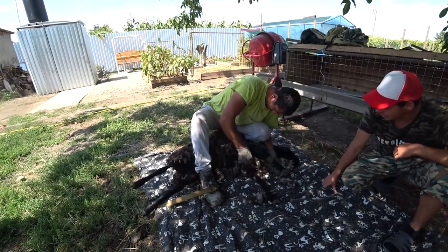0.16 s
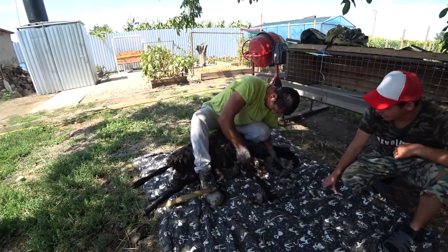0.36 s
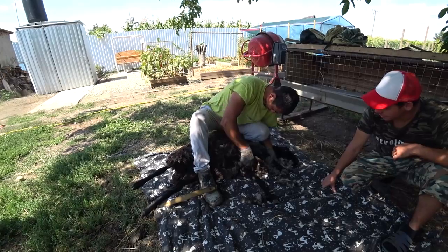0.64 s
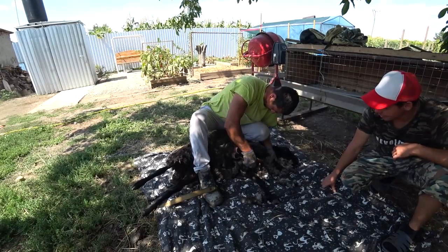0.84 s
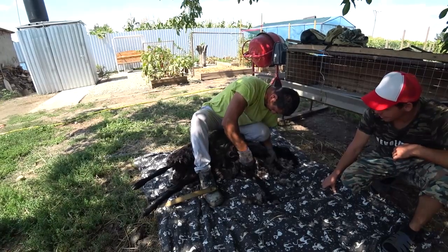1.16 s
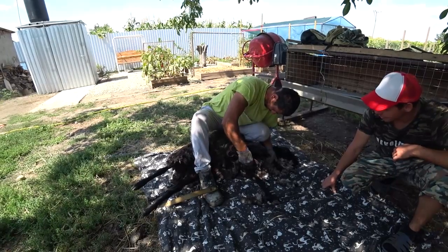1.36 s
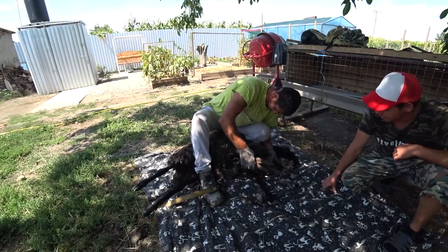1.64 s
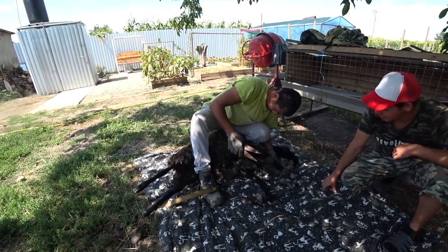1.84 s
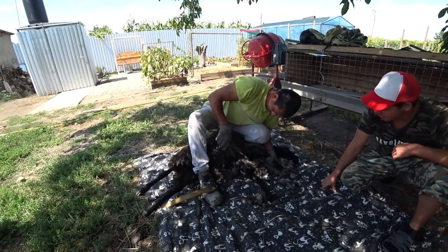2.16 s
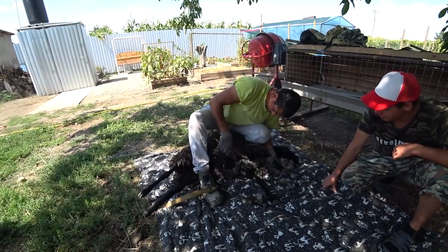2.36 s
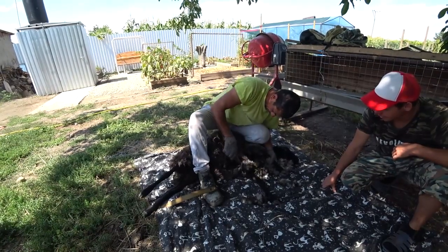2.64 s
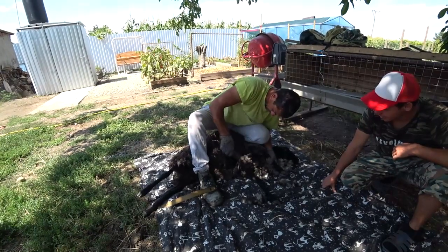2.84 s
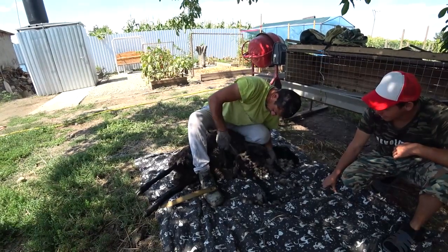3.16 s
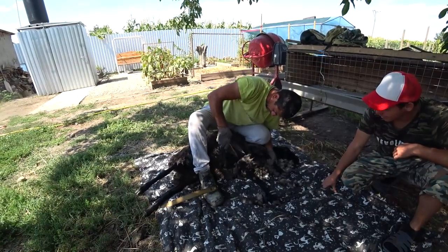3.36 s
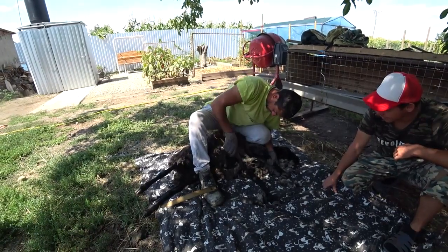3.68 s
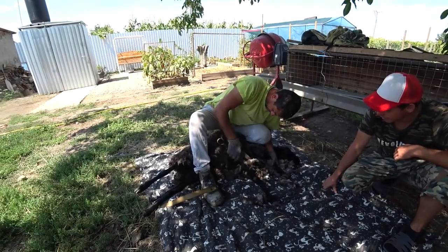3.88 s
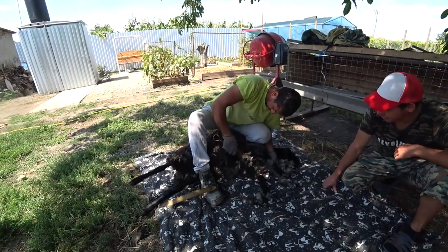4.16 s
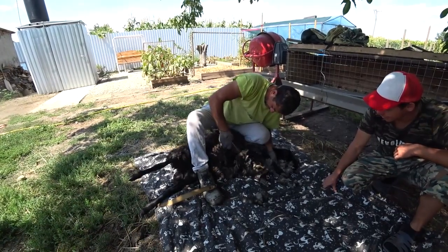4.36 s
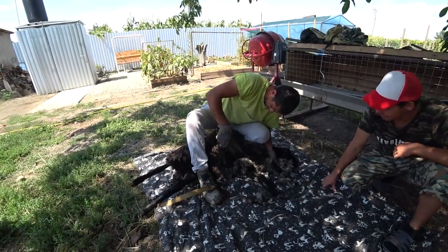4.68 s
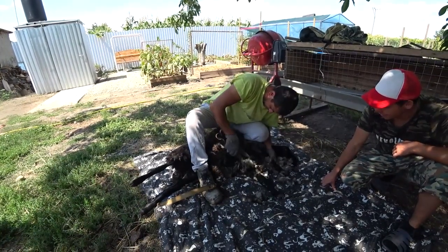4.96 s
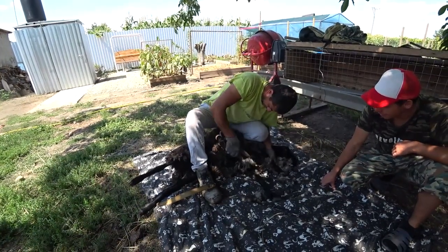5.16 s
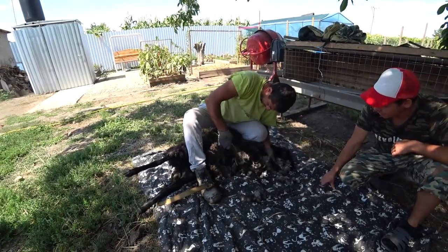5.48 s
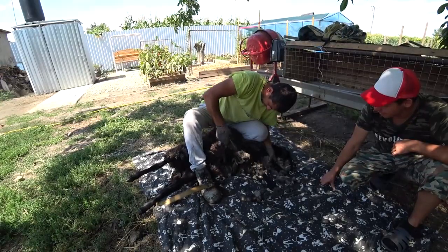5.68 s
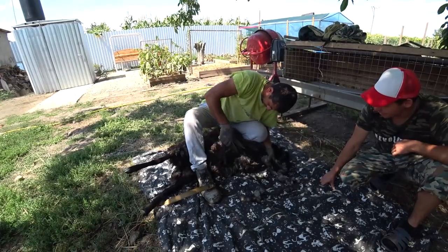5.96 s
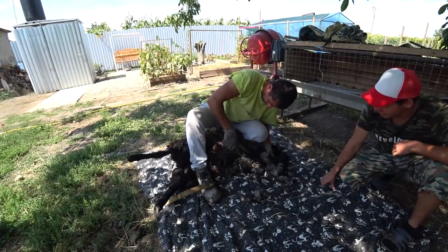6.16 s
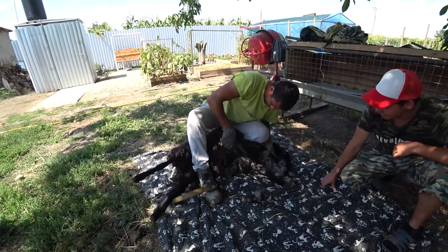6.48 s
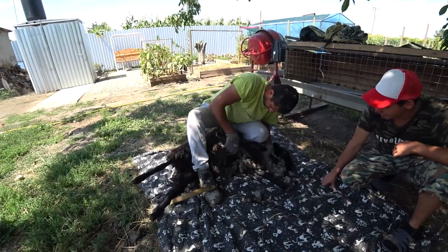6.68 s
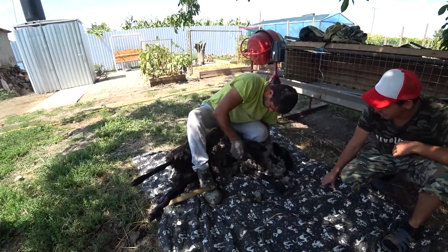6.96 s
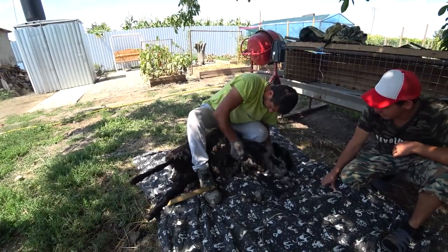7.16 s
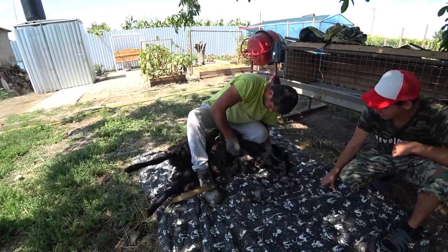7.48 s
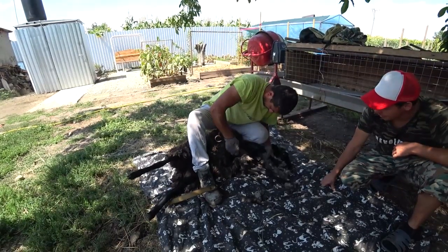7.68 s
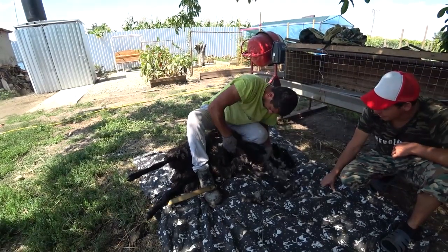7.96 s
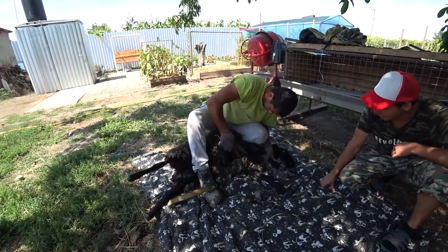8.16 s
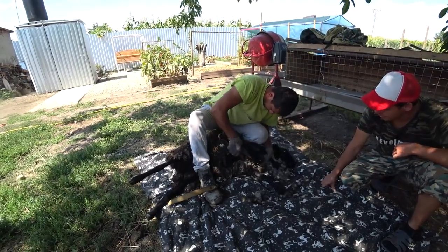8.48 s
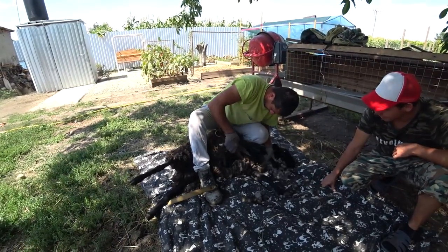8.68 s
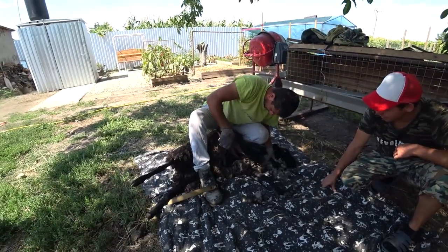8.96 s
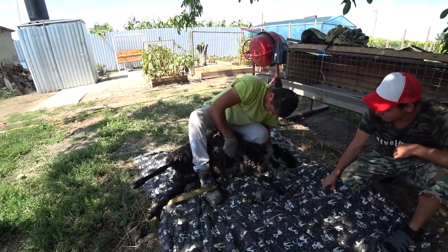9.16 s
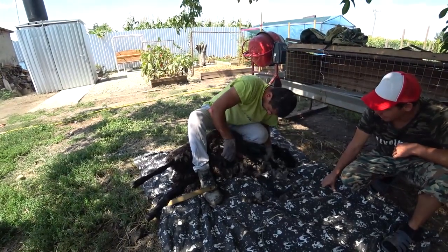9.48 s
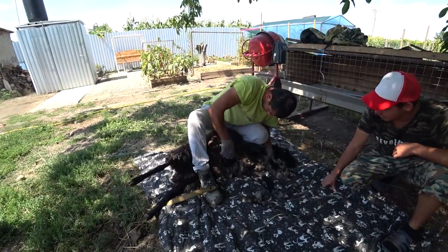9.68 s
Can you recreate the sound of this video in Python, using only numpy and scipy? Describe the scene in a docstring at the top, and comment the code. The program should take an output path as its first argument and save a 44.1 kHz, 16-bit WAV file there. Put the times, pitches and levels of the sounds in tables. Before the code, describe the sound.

In a quiet grassy yard, hand shears work close to a stereo microphone. Small crackling jerks lead to bright metallic snips, two in quick succession near one and a half seconds, then scattered singles. Wool grinds and tears between them, hands rub the fleece, and dull bumps follow. A dog gives two short barks early; distant yelps and birds are barely heard.

```python
"""Hand shears clip a sheep close by in a farmyard: the blades slide shut, stop and ring, and grind through wool.
Slides and cuts are bursts of tiny noise slips coloured by blade resonances; the ring is a sum of decaying sines.
Sharp noise clicks, crackling fleece, dull scuffs and bumps and one rough muffled burst accompany the work.
A dog barks twice nearby, from wavering overtones and throat noise; thin yelps and bird calls are gliding sines
further off, over a quiet outdoor background of coloured noise."""
import sys
import numpy as np
from scipy import signal
from scipy.fft import rfft, irfft, next_fast_len
from scipy.io import wavfile
from scipy.ndimage import uniform_filter1d

SR = 44100
rng = np.random.default_rng(int(sys.argv[2]) if len(sys.argv) > 2 else 0)


def put_to_file(sound):
    """Save the sound as 16-bit audio at rate SR, in the file named by the first command-line argument."""
    columns = np.atleast_2d(sound).T  # one column per channel
    safe = np.clip(columns, -1, 1)
    whole_steps = np.round(safe * 32767)
    wavfile.write(sys.argv[1], SR, whole_steps.astype(np.int16))


N = 433503
TIME = np.arange(N) / SR

# Blades closing, a slide and then a stop. Each row: slide peak in seconds, slide level in dB, slide tilt in
# dB per octave, delay to the stop in seconds, stop level in dB, stop tilt in dB per octave, stop fall in
# seconds, hollow body boost near 1.9 kHz in dB, ring peak in dB, hardest driven resonance in Hz,
# left minus right in dB.
SNIPS = [(.596, -26, 4, .006, -25.5, -4.5, 0.0052, 27, -27, 2010, -5),
         (1.381, -18.5, 4.5, 0.017, -24.5, 1.5, 0.057, 17, -42, 5830, -1),
         (1.507, -14, -1, .013, -15, 4.5, 0.0062, 13.5, -21, 4250, -1.5),
         (3.381, -21.5, 5.5, 0.0067, -21.5, -1.5, .011, 16.5, -27, 2910, -2),
         (4.452, -25.5, 5.5, .011, -15.5, 1, 0.0071, 2, -17.5, 5700, -1.5),
         (5.791, -16, 4, 0.013, -16, 0, 0.0052, 14, -17, 3100, -1.5),
         (8.203, -13, 2.5, .013, -14.5, 2.5, 0.0061, 7, -14.5, 3070, -2)]
# Ringing modes of the free blades. Each row: frequency in Hz, relative level in dB, 60 dB decay in seconds.
BLADE_MODES = [(1210, -7.5, 0.18), (1504, -8, 0.14), (2694, 1.5, 0.059), (3170, 0, 0.028), (3340, 5, 0.013),
               (3730, -11, .04), (4114, 8, 0.14), (4120, -14.5, 0.72), (5560, -13, .05), (5640, 2, 0.083),
               (7280, 6, 0.097), (8950, -6.5, .07), (10100, -8.5, .07), (11990, -1, 0.067)]
# Broad colour of steel sliding on steel. Each row: frequency in Hz, relative level in dB.
SLIDE_COLOUR = [(40, -62.5), (120, -47), (350, -45), (700, -6), (1100, 1), (1900, -6.5), (2250, -14),
                (2800, -15.5), (3600, 12), (4700, 7.5), (5600, 10.5), (7800, 4.5), (10000, 3.5),
                (16000, -11)]
SLIDE_RISE_S, SLIDE_FALL_S, STOP_RISE_S = 0.0077, 0.0055, 0.0053
STOP_BODY_SHARE = 0.97  # share of the hollow boost in dB left once the blades overlap
SLIDE_BITE_DB, STOP_BITE_DB, BITE_WIDTH_HZ = -5.5, -21.5, 130  # the hardest driven resonance


def snips():
    """Edge slides on edge in a rush of tiny slips and stops; freed from the wool, the blades ring on."""
    out = np.zeros((2, N))
    ring = blade_ring()
    pressed = [(hz, 110, db) for hz, db, _ in BLADE_MODES]  # pressed together, the same modes are broad
    for (s, slide_db, slide_slope, gap, stop_db, stop_slope, stop_fall,
         hollow_db, ring_db, bite_hz, pan_db) in SNIPS:
        slide = stroke(s, SLIDE_RISE_S, SLIDE_FALL_S)
        stop = stroke(s + gap, STOP_RISE_S, stop_fall)
        contacts = [(slide, slide_db, slide_slope, hollow_db, SLIDE_BITE_DB),
                    (stop, stop_db, stop_slope, STOP_BODY_SHARE * hollow_db, STOP_BITE_DB)]
        for (start, force), db, slope, body_db, bite_db in contacts:
            rasp = steel_rasp(force, pressed, slope, body_db, bite_hz, bite_db)
            add(out, start, pan(undb(db) * scatter(rasp, db=-10.5), pan_db))
        add(out, s + gap, pan(undb(ring_db) * ring, pan_db))
    return out


def blade_ring():
    """The modes of the free blades die away, each at its own rate; peak level 1."""
    t = np.arange(SR // 2) / SR
    ring = sum(undb(db - 60 * t / t60) * np.sin(2 * np.pi * hz * t) for hz, db, t60 in BLADE_MODES)
    onset = 1 - np.exp(-t / .001)
    return ring * onset / np.abs(ring).max()


def steel_rasp(force, modes, slope, body_db, bite_hz, bite_db):
    """Dense slips drive the steel, its hollow body and the one resonance that is driven hardest."""
    slips = force * grains(len(force), share=.7, spread_db=1.0)

    def gain(f):
        broad = unit(colour(SLIDE_COLOUR, f))
        steel = np.hypot(broad, np.abs(blade(f, modes, drift=.006, spread_db=2.5)))
        hollow = undb(body_db * np.abs(resonance(f, 1910, 400)) ** 2)
        body = unit(steel * tilt(f, slope) * hollow)
        bite = undb(bite_db) * unit(resonance(f, bite_hz, BITE_WIDTH_HZ))
        return unit(body + bite)

    return shape(slips, gain)


# The hand squeezes the blades through a lock of wool. Each row: start in seconds, length in seconds, level at
# the start in dB, level at the end in dB, tilt in dB per octave, hardest driven resonance in Hz.
SQUEEZES = [(.01, 0.21, -56.5, -55, -0.5, 5900), (2.762, 0.25, -50.5, -49, -2, 2980),
            (3.133, 0.067, -47, -44.5, 0.5, 2980), (3.939, .045, -50, -42.5, 1, 3470),
            (4.049, 0.26, -52, -38, -1.5, 2550), (4.84, 0.152, -54, -62, -2.5, 2540),
            (5.24, 0.46, -58, -52, -3.5, 3100), (8.013, 0.041, -36, -31, 0, 5300),
            (9.697, .135, -49, -32.5, .5, 3050)]
# Hard jerks as a tuft gives way. Each row: peak in seconds, level in dB, fall in seconds, tilt in dB per
# octave, hardest driven resonance in Hz.
JERKS = [(.068, -38, .008, 0.5, 5820), (.119, -29, .004, -2, 5800), (0.151, -27.5, .005, 2, 6030),
         (0.175, -34.5, 0.011, 6, 5800), (.649, -37.5, .004, -1.5, 2006), (1.2, -32, 0.0061, 3.5, 5730),
         (1.369, -26, .006, 5, 5730), (2.797, -35.5, .003, 5, 2970), (2.856, -31, 0.0051, -1.5, 2970),
         (2.928, -37.5, 0.019, -0.5, 3100), (2.989, -27.5, 0.0052, -1, 3050),
         (3.018, -32, 0.0046, -2, 3050), (3.044, -30, 0.0052, -.5, 3110), (4.102, -34.5, 0.0094, 1, 2550),
         (4.291, -25.5, .009, 5, 5300), (5.301, -31.5, 0.014, -1, 3100), (5.376, -42.5, 0.021, -4, 3100),
         (7.3, -34.5, 0.0031, 3, 3180), (7.758, -39, 0.013, -2, 3160), (8.027, -26, 0.0093, 3, 5180),
         (8.052, -25, 0.0083, .5, 5280), (9.717, -35.5, 0.0046, -5, 5650), (9.735, -28, 0.0085, 0.5, 5670),
         (9.816, -33, .0065, 2, 3100)]
JERK_RISE_S, GRIP_S = 0.0034, 0.0046  # build-up of a jerk; time to grip and let go in a squeeze
JUDDER_HZ, JUDDER_SCATTER = 38.15, .3  # mean rate of stick and slip; its random variation as a share
JUDDER_DB, SLIP_SPREAD_DB = 11.5, 2.5  # fall in level over each slip; random level from slip to slip
BITE_DB, GRIND_BITE_DB = -6.5, -15.5  # hardest driven resonance in a jerk and in steady grinding


def cuts():
    """Each squeeze grinds on in a quick stick and slip; now and then a whole tuft gives way with a jerk."""
    out = np.zeros((2, N))
    for s, length, from_db, to_db, slope, bite_hz in SQUEEZES:
        t = np.arange(SR // 3) / SR
        rate = JUDDER_HZ * (1 + JUDDER_SCATTER * walk(JUDDER_HZ, size=len(t)))
        slip, cycle = np.divmod(np.cumsum(rate) / SR, 1)
        slip_db = SLIP_SPREAD_DB * rng.standard_normal(size=64)[slip.astype(int)]
        judder_db = JUDDER_DB * (.5 - cycle) + slip_db
        grip = np.clip(np.minimum(t, length - t) / GRIP_S, 0, 1)
        force = grip * undb(np.interp(t, [0, length], [from_db, to_db]) + judder_db)
        for turn in range(3):  # neighbouring slips catch at different places on the edge
            add(out, s, cut(force * (slip % 3 == turn), slope, bite_hz, GRIND_BITE_DB))
    for s, db, fall, slope, bite_hz in JERKS:
        start, force = stroke(s, JERK_RISE_S, fall)
        add(out, start, undb(db) * cut(force, slope, bite_hz, BITE_DB))
    return pan(out, -1.7)


# Blade resonances while wool damps them. Each row: frequency in Hz, width in Hz, relative level in dB.
DAMPED_MODES = [(490, 16, -4.5), (1376, 186, -6.5), (1810, 100, -5), (2530, 65, -0.5), (3072, 69, 5.5),
                (3550, 290, -3), (4180, 156, 1.5), (5265, 380, 3.5), (5707, 92, 5), (6620, 170, -2),
                (7460, 77, -1.5), (8650, 360, -7.5), (10020, 97, -8), (12500, 50, -4)]
# Colour of parting fibres. Each row: frequency in Hz, relative level in dB.
FIBRE_COLOUR = [(60, -49), (400, 15), (1000, -51), (2500, 55), (5500, -19.5), (9000, -22), (13000, 1),
                (16000, -32)]


def cut(force, slope, bite_hz, bite_db):
    """Fibres part between wool-damped blades; the crossing point of the edges drives one resonance hardest."""
    slips = force * grains(len(force), share=.15, spread_db=2.5)

    def gain(f):
        steel = blade(f, DAMPED_MODES, drift=0.016, spread_db=5.0)
        bite = undb(bite_db) * unit(resonance(f, bite_hz, bite_hz / 40))
        fibres = undb(-17.5) * unit(colour(FIBRE_COLOUR, f))
        return unit((steel + bite + fibres) * tilt(f, slope))

    return scatter(shape(slips, gain), db=-10.0)


def blade(f, modes, drift, spread_db):
    """Damped resonances; the crossing point of the edges shifts and reweights them at every stroke."""
    chance = rng.standard_normal((len(modes), 2))
    return unit(sum(undb(db + spread_db * a) * resonance(f, hz * (1 + drift * b), width)
                    for (hz, width, db), (a, b) in zip(modes, chance)))


# Sharp clicks of steel and snapping stalks. Each row: peak in seconds, level in dB before the common trim,
# fall in seconds, tilt in dB per octave.
CLICKS = [(.915, -34, 0.0068, -5), (0.946, -34.5, 0.0091, -5), (1.386, -.5, 0.0038, -3.5),
          (1.458, -15, 0.0015, -8), (1.605, -29.5, 0.0047, -7), (1.719, -34, 0.01, -7),
          (5.161, -28.5, 0.0029, -1), (5.23, -29, 0.0069, -4.5), (5.865, -22, 0.011, 0),
          (6.34, -33.5, 0.02, -3), (6.531, -33.5, 0.022, -8), (6.953, -25.5, .0012, -3),
          (7.033, -33.5, 0.009, 0), (7.709, -33, .005, -3), (8.073, -15, 0.003, -9),
          (9.005, -52, .0034, -9), (9.676, -32, 0.0087, -5)]
# Colour of the clicks. Each row: frequency in Hz, relative level in dB.
CLICK_COLOUR = [(50, -72), (300, -44), (800, -45.5), (1700, -8.5), (3300, -8.5), (4700, -1), (5700, 5),
                (6800, 2), (8000, 5.5), (10000, -1.5), (16000, -6)]


def clicks():
    """Abrupt contacts with almost no ring: noise bursts that rise almost at once."""
    out = np.zeros((2, N))
    for s, db, fall, slope in CLICKS:
        start, force = stroke(s, 0.00022, fall)
        noise = force * rng.standard_normal(len(force))
        crack = shape(noise, lambda f: unit(colour(CLICK_COLOUR, f) * tilt(f, slope)))
        add(out, start, undb(db - 5.5) * scatter(crack, db=-7.5))  # common trim of -5.5 dB
    return pan(out, -1.3)


# Hands push and pull the fleece. Each row: start in seconds, time until release in seconds, relative level in dB.
PUSHES = [(0.287, 0.15, -53), (1.557, .16, -53), (2.77, 0.29, -52), (3.406, 0.12, -52), (3.617, 0.2, -54.5),
          (3.938, 0.35, -49.5), (4.495, 0.26, -50), (4.818, 0.19, -54.5), (5.052, 0.35, -50.5),
          (5.57, 0.31, -48.5), (5.901, 0.29, -50.5), (6.371, 0.33, -52.5), (6.719, .13, -56.5),
          (6.841, 0.49, -52.5), (7.495, 0.32, -47.5), (7.859, 0.26, -52), (9.085, 0.69, -60.5)]
# Colour of the rustling fleece. Each row: frequency in Hz, relative level in dB.
FLEECE_COLOUR = [(50, -9), (140, -13.5), (400, -1), (1200, 3), (2200, 1.5), (3600, 3.5), (5600, 5.5),
                 (8000, 3.5), (12000, -0.5), (16000, -6)]
PUSH_ATTACK_S, PUSH_RELEASE_S = 0.035, 0.019
RESTING_DB = -59.5  # between pushes the fleece still stirs


def rustle():
    """Hands drag through the fleece: dense crackle in uneven pushes."""
    pushes = sum(undb(db) * swell(s, length, PUSH_ATTACK_S, PUSH_RELEASE_S) for s, length, db in PUSHES)
    effort = np.hypot(undb(RESTING_DB), pushes)
    slips = grains((2, N), share=.15, spread_db=-0.5)
    mid, side = unit(shape(slips, lambda f: colour(FLEECE_COLOUR, f)))
    crackle = mid + undb(-1.5) * side * np.array([[1], [-1]])
    flutter = undb(1.45 * walk(45) + 0.6 * walk(6.6))
    return pan(crackle * effort * flutter, -1.2)


# Dull scuffs and bumps, and a rough muffled burst near 7.15 s that may be a far bark. Each row: peak in
# seconds, level in dB before the common trim, fall in seconds, centre in Hz.
SCUFFS = [(5.837, -57, .025, 130), (5.89, -46.5, 0.063, 1210), (7.149, -40, 0.091, 860),
          (7.18, -46, 0.088, 4200), (7.268, -40.5, 0.017, 3000), (7.278, -45, 0.05, 200),
          (7.304, -65, .06, 60), (7.698, -51.5, 0.068, 292), (8.438, -42.5, .03, 1090),
          (9.42, -49, 0.036, 1160)]
SCUFF_RISE_SHARE = 0.21  # rise time as a share of the fall


def scuffs():
    """Dull scuffs and bumps and a rough muffled burst: sparse noise grains through one broad resonance."""
    out = np.zeros((2, N))
    for s, db, fall, hz in SCUFFS:
        start, force = stroke(s, SCUFF_RISE_SHARE * fall, fall)
        noise = force * grains(len(force), share=.05, spread_db=2.5)
        burst = shape(noise, lambda f: unit(resonance(f, hz, 1.4 * hz) ** 2))
        add(out, start, undb(db - 1.5) * scatter(burst, db=-11))  # common trim of -1.5 dB
    return out


# The near dog. Each row: start in seconds, length in seconds, pitch in the middle in Hz, level in dB,
# pitch arch as a share, pitch sag as a share, growl from 0 to 1, rasp from 0 to 1.
BARKS = [(.974, 0.18, 541.3, -17.5, .24, -0.0205, 0.45, 0.27),
         (1.201, 0.071, 522, -25.5, 0.028, .08, 0.3, 0.7)]
# Its throat and open mouth. Each row: frequency in Hz, relative level in dB.
THROAT = [(80, -39), (200, -32), (330, -21), (520, -14.5), (660, -18), (820, -5), (1080, -3), (1330, -1),
          (1600, -3), (1950, -15.5), (2500, -14.5), (3400, -8.5), (4600, -23), (7800, -17.5),
          (15000, -44.5)]
BARK_SWELL_DB, BARK_EDGE_S = 19.5, 0.0072  # gain from edges to middle; time the folds take to start and stop
BARK_HISS_DB, BARK_FULL_DB = 0.5, -17.5  # hiss against the voice at full level; that level
HISS_GROWTH = 1.25  # dB of hiss per dB of level
BARK_ECHO_S, BARK_ECHO_DB = 0.045, -16.5


def barks():
    """Effort arches pitch and level; uneven vocal folds and air rasping once a cycle share one throat."""
    out = np.zeros(N)
    for s, length, mid_hz, db, arch, sag, growl, rasp in BARKS:
        u = np.linspace(0, 1, int(length * SR))
        effort = 1 - (2 * u - 1) ** 2
        hz = mid_hz * (1 - arch * (1 - effort) - sag * (u - .5))
        phase = 2 * np.pi * np.cumsum(hz * (1 + .012 * walk(250, size=len(u)))) / SR
        folds = np.zeros(len(u))
        for k in range(1, 10):  # each overtone wavers on its own
            overtone = np.cos(k * phase + 2 * np.pi * rng.random()) / np.hypot(1, (k / 3.7) ** 3)
            folds += overtone * (1 + .28 * walk(200, size=len(u)))
        # growl: every second beat is weaker
        folds *= 1 + growl * effort * np.cos(phase / 2 + .5 * walk(77, size=len(u)))
        voice = unit(shape(folds, lambda f: colour(THROAT, f)))
        breath = rng.standard_normal(len(u)) * (1 + 0.2 * np.cos(phase))
        air = shape(breath, lambda f: unit(colour(THROAT, f)))
        hiss = shape(air, lambda f: 1 / (1 + (2200 / f) ** 6))  # the part above 2.2 kHz
        force = undb(BARK_SWELL_DB * (effort - 1))
        # only a hard bark is bright
        bright = undb(BARK_HISS_DB + HISS_GROWTH * (db - BARK_FULL_DB)) * force ** 0.42
        # the rasp clears as the folds take hold
        sound = voice + 2 * rasp * (1 - u) * (air - hiss) + bright * hiss
        edges = np.clip(np.minimum(u, 1 - u) * length / BARK_EDGE_S, 0, 1)
        add(out, s, undb(db) * force * edges * sound)
    echo = undb(BARK_ECHO_DB) * np.interp(TIME - BARK_ECHO_S, TIME, out)  # off the fence
    return pan(scatter(out + echo, db=-10), -.9)


# Far dogs yelping. Each row: start in seconds, level in dB before the yelp trim, pitch in Hz, length in seconds.
YELPS = [(0.364, -51, 1020, .05), (.512, -47.5, 1250, 0.047), (1.698, -44.5, 1092, 0.049),
         (2.125, -39.5, 1165, 0.03), (4.612, -56.5, 960, 0.062), (5.053, -47, 1103, 0.048),
         (6.125, -57, 1346, 0.12), (6.934, -46.5, 1093, 0.048), (7.094, -43.5, 1115, 0.12),
         (7.191, -49, 1395, 0.054), (9.34, -58, 902, 0.186), (9.47, -59, 1497, 0.09)]
# Birds. Each row: start in seconds, level in dB before the chirp trim, pitch in Hz, length in seconds,
# fall in pitch as a share.
CHIRPS = [(1.81, -55.5, 5450, .08, 0.046), (1.976, -58, 4140, 0.12, 0.4), (2.506, -54, 4320, 0.069, .08),
          (9.205, -57, 5500, .1, .4)]
YELP_SAG_PER_S = 0.77  # fall in pitch by the end, as a share per second of length


def far_calls():
    """Dogs yelp and birds chirp beyond the yard, each call a short sagging tone."""
    out = np.zeros(N)
    for s, db, hz, length in YELPS:
        add(out, s, undb(db + 3.5) * cry(hz, length, YELP_SAG_PER_S * length))  # yelp trim of +3.5 dB
    for s, db, hz, length, sag in CHIRPS:
        add(out, s, undb(db + 4) * cry(hz, length, sag))  # chirp trim of +4 dB
    return pan(out, 2.8)


def cry(hz, length, sag):
    """A nearly pure tone with a faint octave that swells, fades and sags in pitch."""
    u = np.linspace(0, 1, int(length * SR))
    waver = .02 * np.sqrt(hz / 1000) * walk(700, size=len(u))
    phase = 2 * np.pi * np.cumsum(hz * (1 - sag * u ** 1.5 + waver)) / SR
    return np.sin(np.pi * u) * (np.sin(phase) + undb(-24) * np.sin(2 * phase))


# Colour of the outdoor background. Each row: frequency in Hz, relative level in dB per Hz.
YARD_COLOUR = [(15, -75), (25, -79), (117, -16), (195, -5), (405, -5.5), (489, -3.5), (754, -5), (911, -3),
               (988, -2.5), (2000, -7), (2690, -8.5), (4250, -7), (5430, -11.5), (6380, -11.5),
               (16000, -41)]
YARD_DB = -58  # typical level of the middle signal


def yard():
    """Distant air and foliage: noise alike at both ears in the bass and wide in the treble."""
    mid, side = shape(rng.standard_normal((2, N)), lambda f: colour(YARD_COLOUR, f))
    side = shape(side, lambda f: .9 * (f + 100) / (f + 600))
    air = (mid + side * np.array([[1], [-1]])) / np.std(mid)
    return air * undb(YARD_DB + 0.65 * walk(2.53))


def space(x, far_db, t60):
    """Fence and sheds add a thin, duller tail, different at each ear."""
    t = np.arange(int(.7 * SR)) / SR
    far = rng.standard_normal((2, len(t))) * undb(-60 * t / t60) * (1 - np.exp(-t / .012))
    far = unit(shape(far, lambda f: 1 / np.hypot(1, f / 5000))) / np.sqrt(len(t))
    return x + undb(far_db) * signal.fftconvolve(x, far, axes=-1)[:, :N]


def scatter(x, db):
    """Ground and bodies scatter a sound within milliseconds; that part reaches the ears out of step."""
    t = np.arange(SR // 30) / SR
    response = rng.standard_normal(len(t)) * np.exp(-t / .005) * (t > .0004)
    side = signal.fftconvolve(x, response / np.linalg.norm(response))[:len(x)]
    return x + undb(db) * side * np.array([[1], [-1]])


def undb(db):
    """Decibels to gain."""
    return 10 ** (np.asarray(db) / 20)


def unit(x):
    """Scale to rms 1."""
    return x / np.sqrt(np.mean(np.abs(x) ** 2))


def shape(x, gain):
    """Filter by a gain given as a function of frequency."""
    size = next_fast_len(x.shape[-1] + 2048)
    f = np.maximum(np.arange(size // 2 + 1) * SR / size, 1)
    return irfft(rfft(x, size) * gain(f), size)[..., :x.shape[-1]]


def colour(points, f):
    """Gain at f of a spectrum of (Hz, dB) points."""
    hz, db = np.transpose(points)
    return undb(np.interp(np.log(f), np.log(hz), db))


def tilt(f, db_per_octave):
    """A slope that turns about 5 kHz and is flat below 1 kHz."""
    return undb(db_per_octave * np.log2(np.maximum(f, 1000) / 5000))


def resonance(f, hz, width):
    """Response of one resonance, gain 1 at its centre."""
    return 1 / (1 + 1j * (f * f - hz * hz) / (f * width))


def walk(rate, size=N):
    """Slow chance with spread near 1: random steps at the rate, smoothed."""
    k = int(SR / rate)
    steps = np.repeat(rng.standard_normal(size // k + 1), k)
    return 1.3 * uniform_filter1d(steps, k)[:size]


def grains(size, share, spread_db):
    """Tiny slips of uneven size on a share of the samples."""
    slips = rng.standard_normal(size) * (rng.random(size) < share)
    return unit(slips * undb(spread_db * np.minimum(rng.exponential(size=size), 5)))


def stroke(s, rise, fall):
    """Start time and envelope of a contact that builds up to its peak at s and dies away."""
    t = np.arange(-SR // 6, SR // 3) / SR
    return s + t[0], np.exp(-np.abs(t) / np.maximum(np.where(t < 0, rise, fall), 1e-4))


def swell(s, length, attack, release):
    """Envelope that rises from s, holds until s + length and dies away."""
    rise = np.clip((TIME - s) / attack, 0, 1)
    return rise * np.exp(-np.clip((TIME - s - length) / release, 0, 30))


def add(out, s, x):
    """Mix x into out from time s."""
    i = int(round(s * SR))
    a, b = max(i, 0), min(i + x.shape[-1], N)
    out[..., a:b] += x[..., a - i:b - i]


def pan(x, db):
    """Place a sound by its left minus right level."""
    return x * undb(np.array([[db], [-db]]) / 2)


def scene():
    """Shearing close by, a dog near, calls further out and the yard behind."""
    work = space(snips() + cuts() + clicks() + rustle() + scuffs(), far_db=-14.0, t60=0.16)
    dog = space(barks(), far_db=-15, t60=0.44)
    calls = space(far_calls(), far_db=-4, t60=0.24)
    return work + dog + calls + yard()


def record(dry):
    """Clip at full scale, thin the deep bass below 55 Hz and cut the top above 15.9 kHz."""
    thin = signal.sosfilt(signal.butter(2, 55, "high", fs=SR, output="sos"), np.clip(dry, -1, 1))
    return signal.sosfilt(signal.ellip(10, .2, 70, 15900, fs=SR, output="sos"), thin)


dry = scene()
out = record(dry)
put_to_file(out)
```